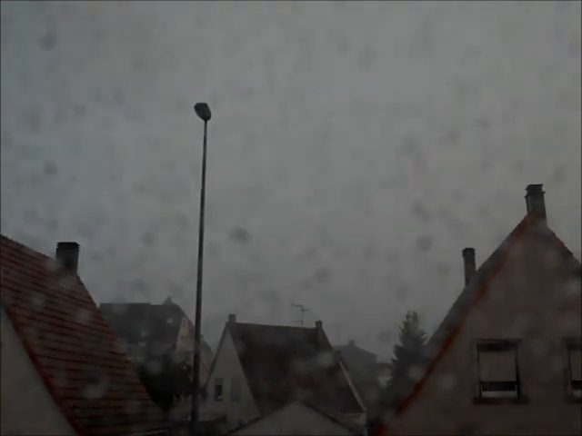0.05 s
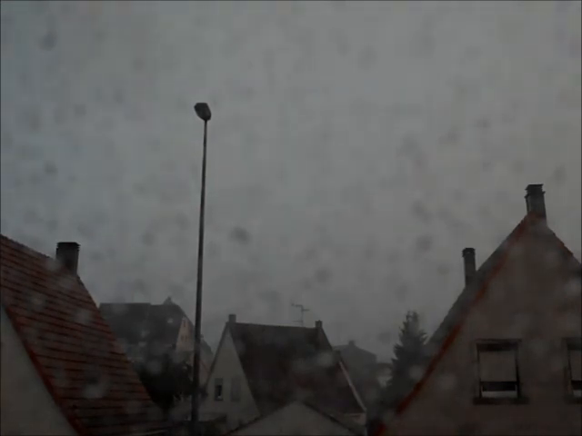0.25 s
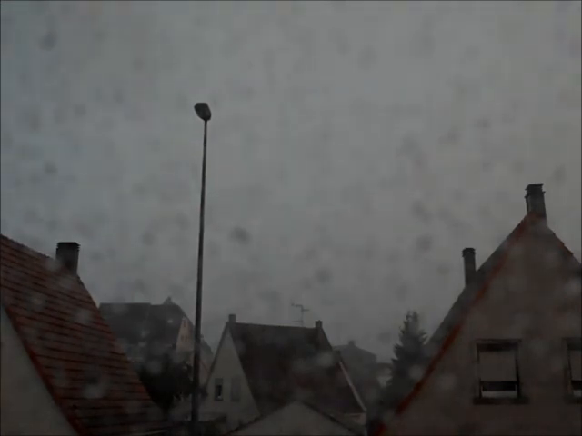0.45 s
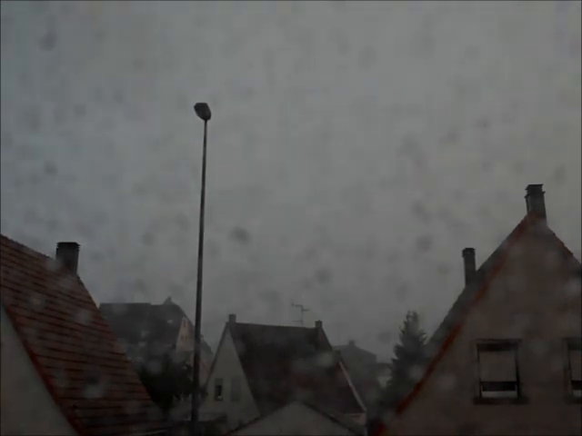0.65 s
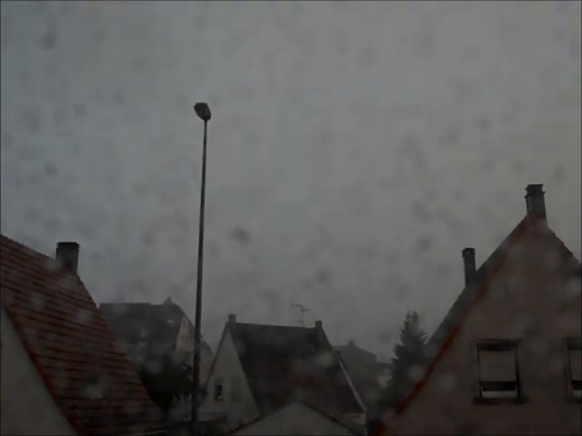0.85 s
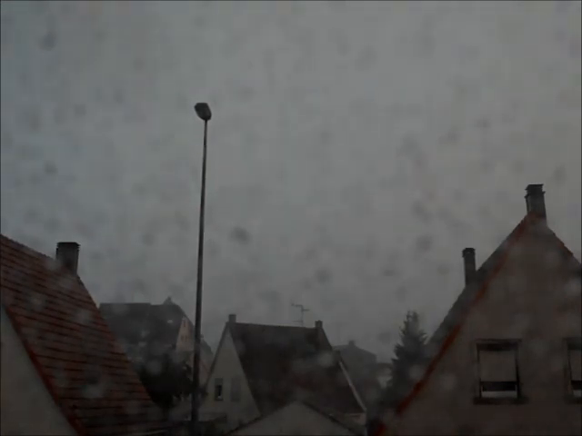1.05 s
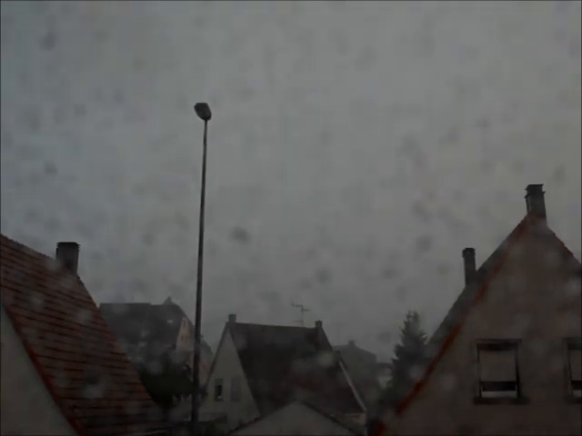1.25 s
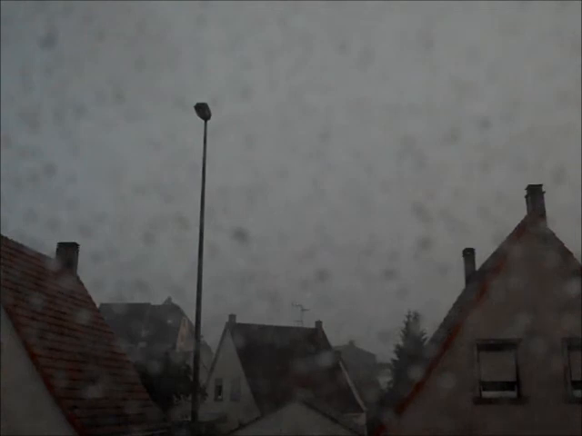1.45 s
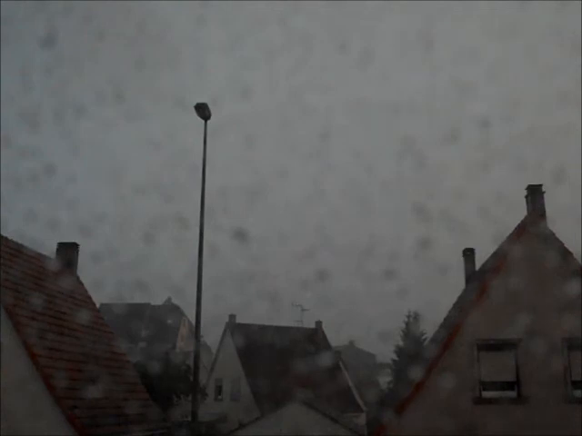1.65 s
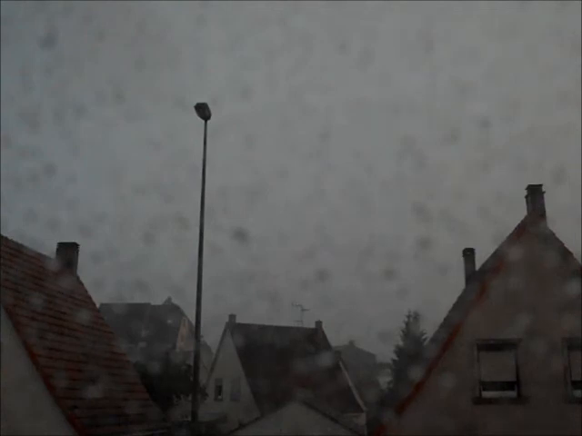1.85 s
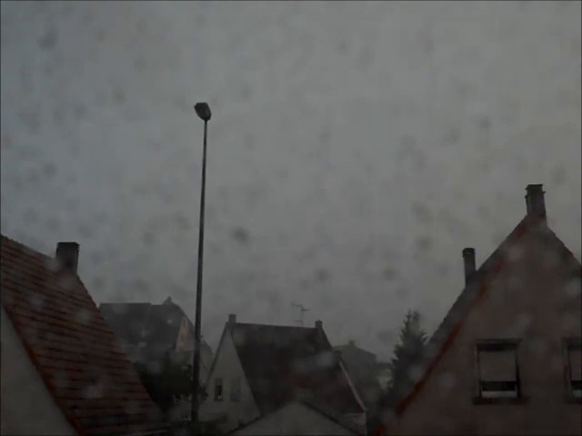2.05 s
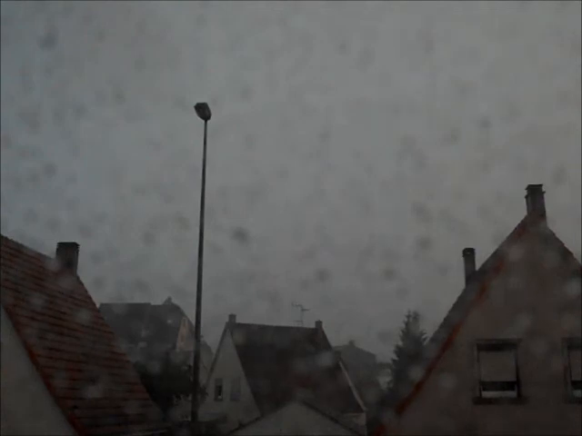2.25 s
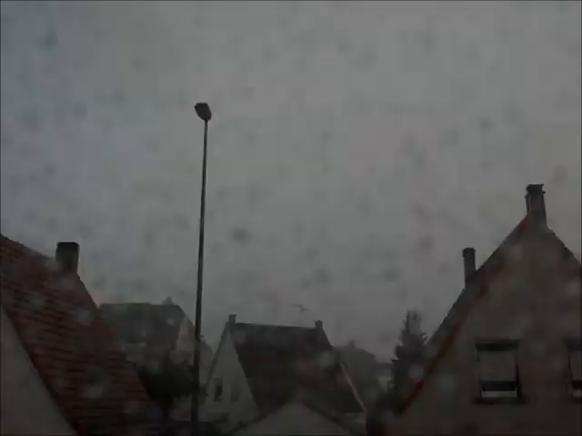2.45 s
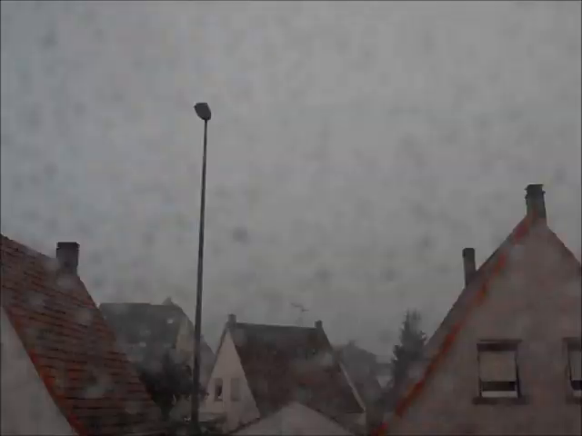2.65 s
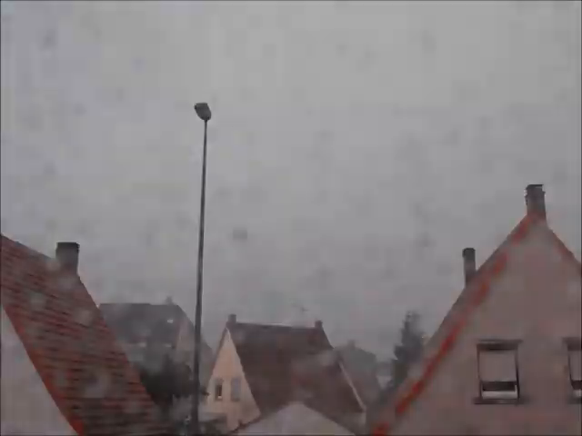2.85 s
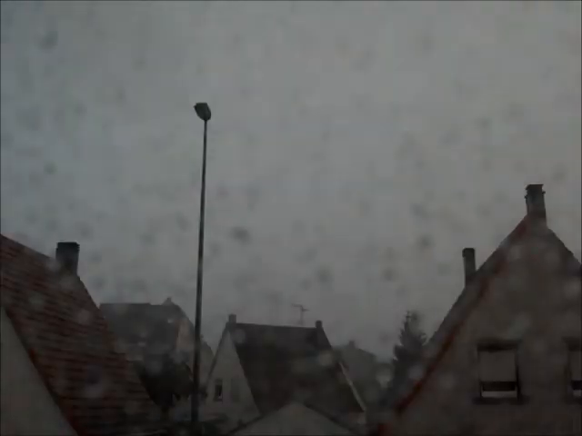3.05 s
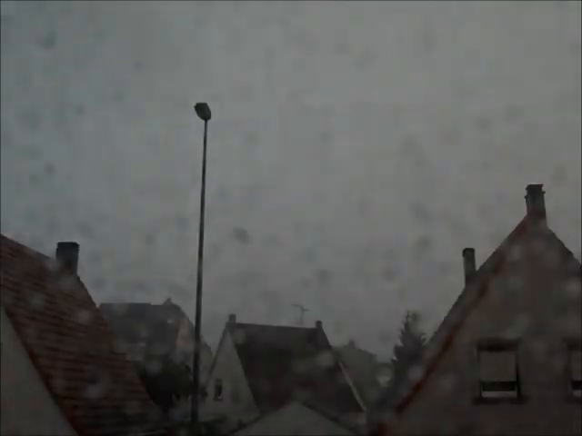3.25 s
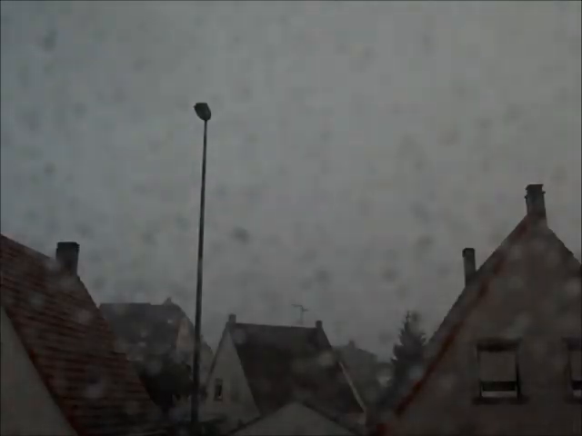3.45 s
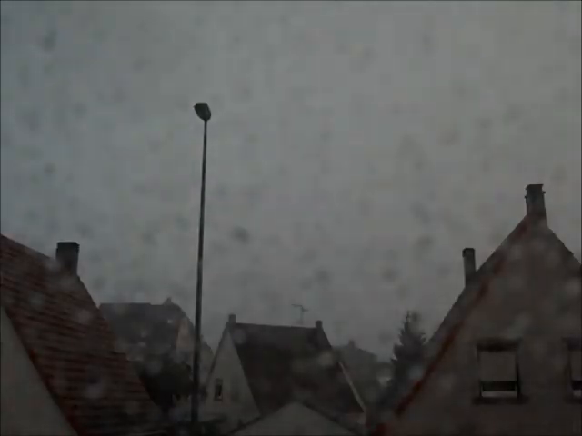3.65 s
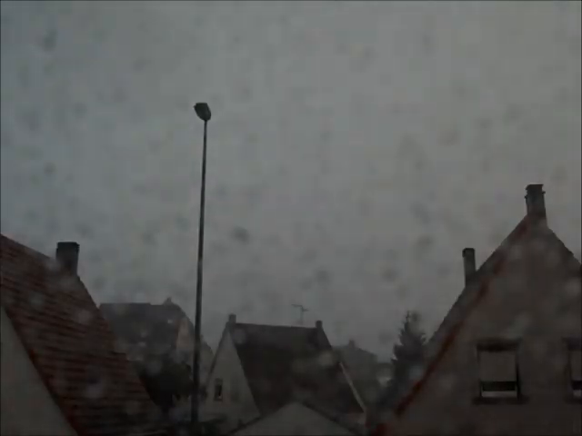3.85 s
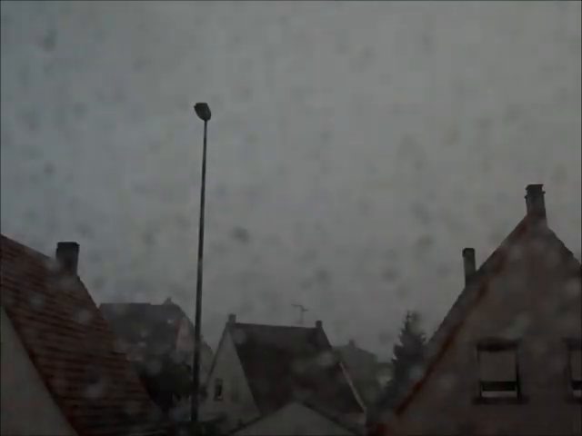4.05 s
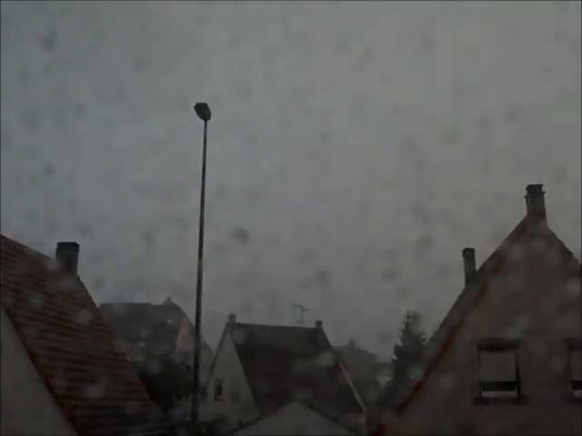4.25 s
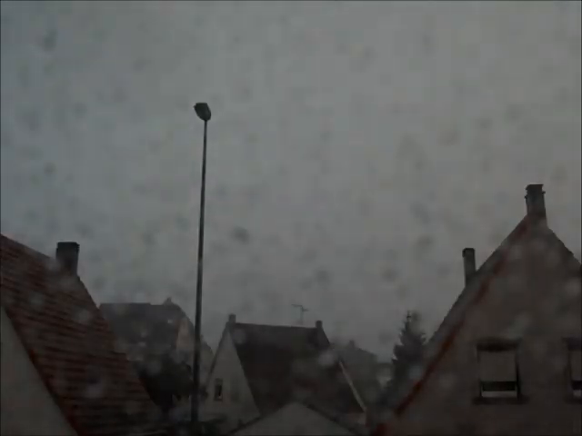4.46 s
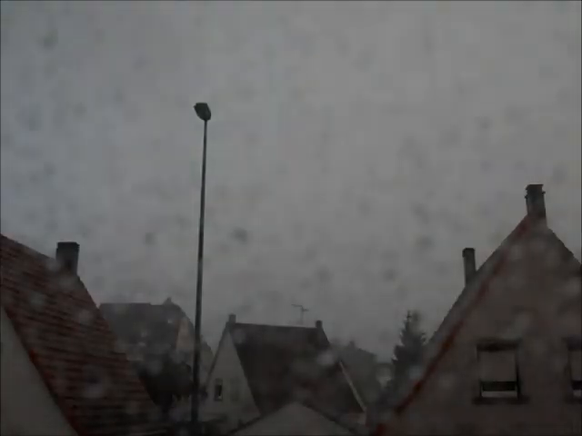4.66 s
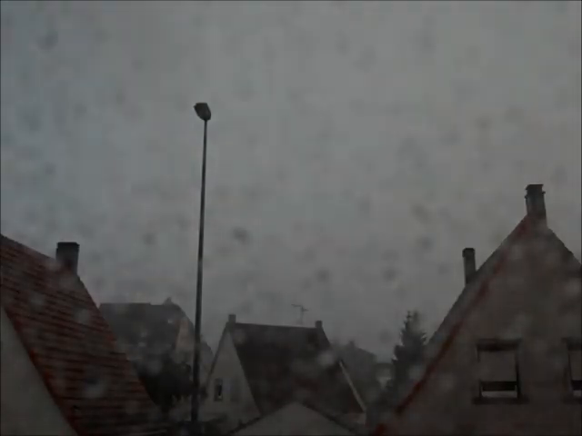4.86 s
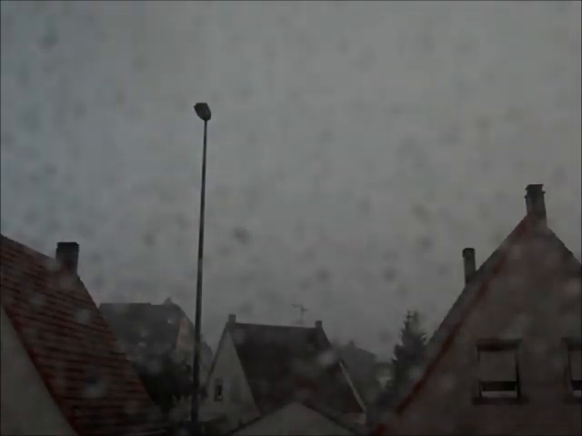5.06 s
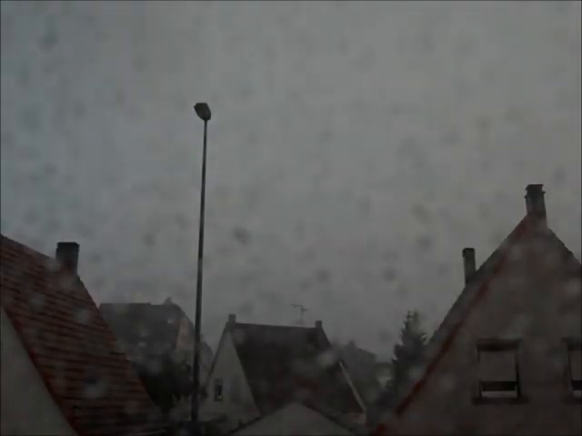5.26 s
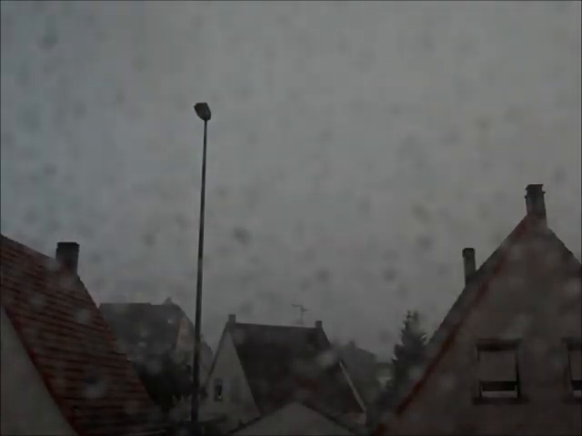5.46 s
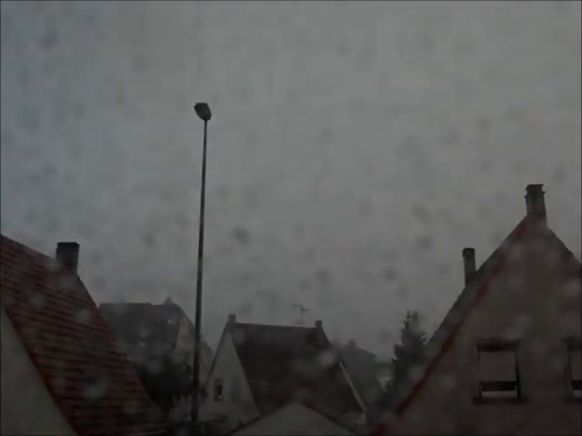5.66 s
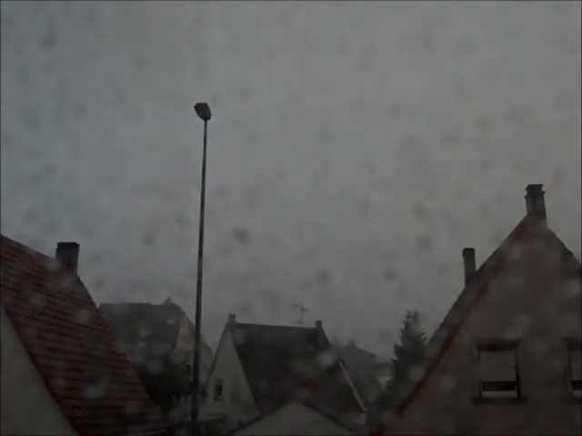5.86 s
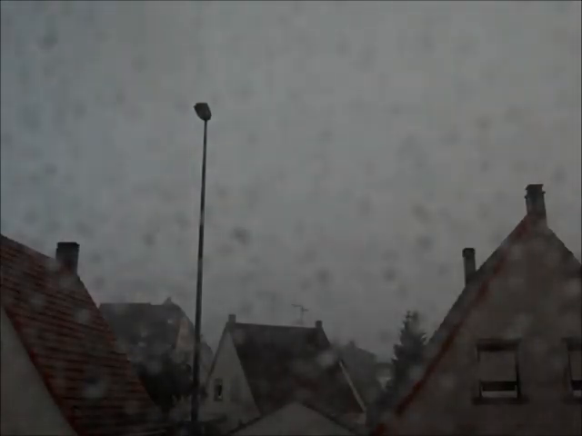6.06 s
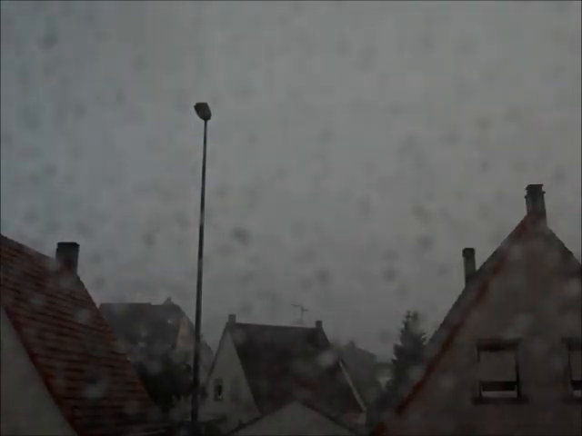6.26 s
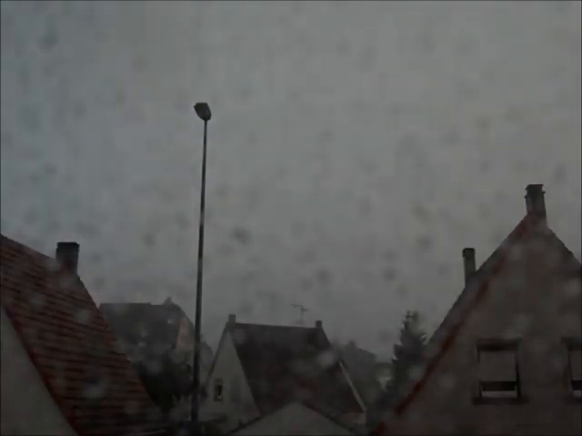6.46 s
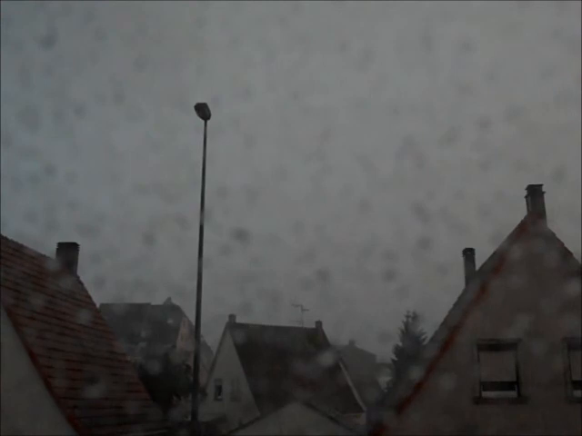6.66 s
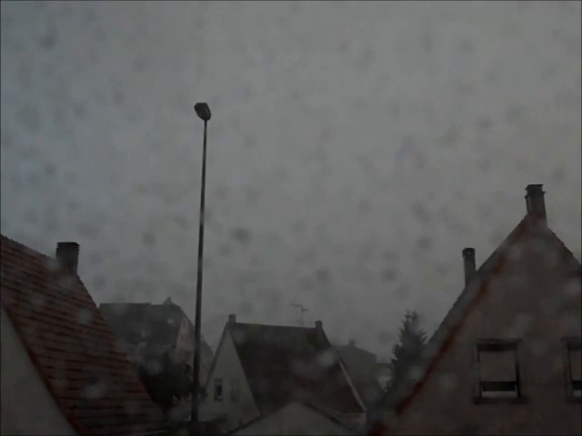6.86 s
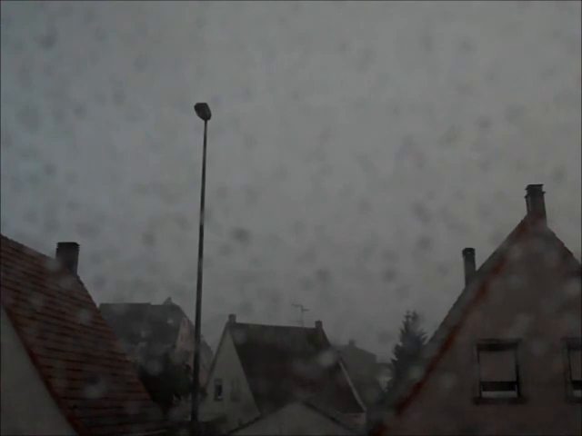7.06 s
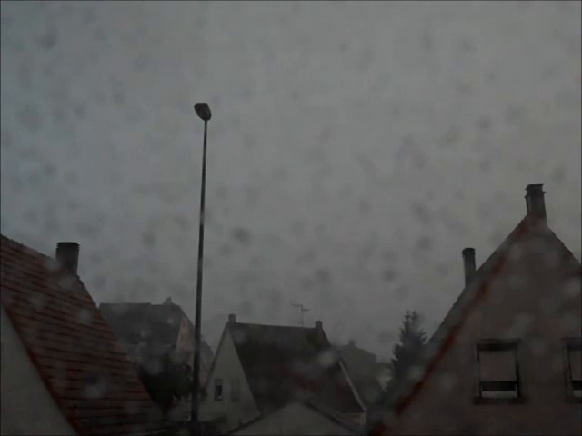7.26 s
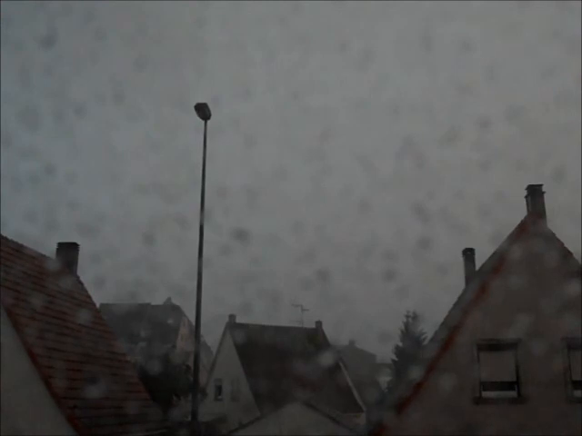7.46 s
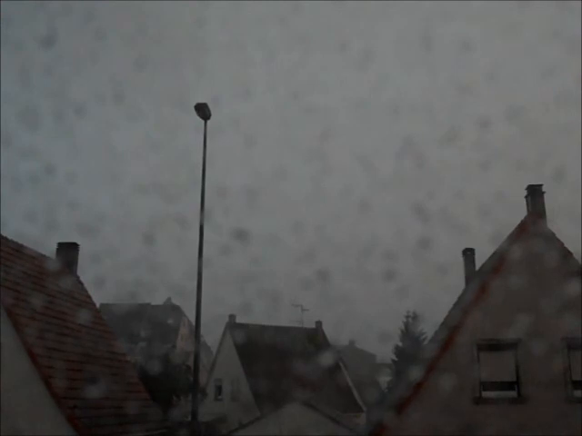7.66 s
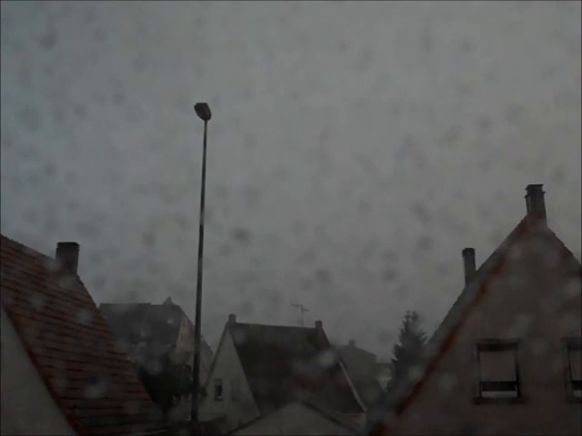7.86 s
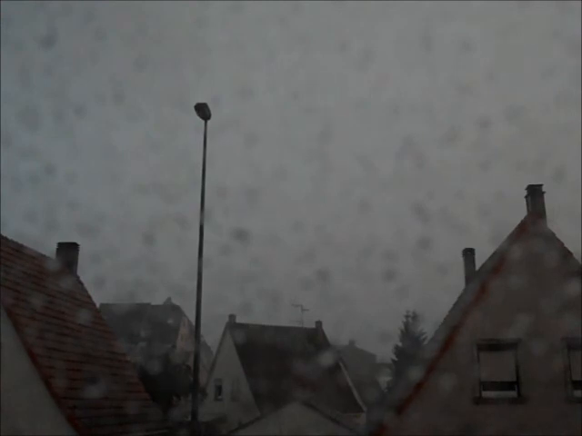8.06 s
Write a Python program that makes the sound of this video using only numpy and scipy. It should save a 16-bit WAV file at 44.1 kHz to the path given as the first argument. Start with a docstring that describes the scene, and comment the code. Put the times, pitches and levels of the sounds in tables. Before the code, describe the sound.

Muffled heavy rain heard behind a closed window, then a sudden close thunderclap crashes in two overloaded peaks and rolls away in low thumps.

```python
"""A room behind a closed window, heard through a small camera while heavy rain falls outside.
Rain is filtered noise and random impulses; heavier drops on the window are short noise bursts.
A close thunderclap sums sub-bass, boom, roar and a tearing edge from overlapping peals; it peaks twice,
overloads the microphone and rolls away in low thumps. Resonances stand for the room and the pane.
A faint whistle and a thin high ring join in; the camera adds hiss and a whine that switches every picture."""
import sys
import numpy as np
from scipy import signal
from scipy.fft import rfft, irfft, next_fast_len
from scipy.io import wavfile
from scipy.ndimage import uniform_filter1d, map_coordinates

SR = 44100
rng = np.random.default_rng(int(sys.argv[2]) if len(sys.argv) > 2 else 0)


def wav_record(signal):
    """Record a signal, one row per channel, as 16-bit PCM in the file named by sys.argv[1]."""
    frames = np.transpose(np.atleast_2d(signal))
    bounded = np.clip(frames, -1, 1)
    # unit amplitude maps onto the largest positive 16-bit level
    quanta = np.round(bounded * 32767).astype(np.int16)
    wavfile.write(sys.argv[1], SR, quanta)


N = 357651

# Shock fronts that stand out of the roll, level before the room: (time [s], peak level [dB])
THUMP_FRONTS = [(4.946, -22), (5.282, -3), (5.37, -5), (5.389, -3), (5.755, 0.5), (5.81, -2), (5.859, -3.5),
                (6.599, -14), (7.075, -7), (7.14, -13), (7.191, -7), (7.205, -7), (7.692, -14)]
# Heavy drops striking the window: (time [s], peak level [dB])
WINDOW_DROPS = [(0.038, -20.5), (1.052, -24), (1.645, -32), (2.184, -24), (3.019, -24), (3.154, -23.5)]
# Standing waves of the room: (frequency [Hz], width [Hz], near level [dB], far level [dB])
ROOM_MODES = [(31, 22, -5, -13), (51, 14, -4, -11), (65.8, 9, -2, 2), (91.4, 4.4, 0.5, -17),
              (120, 5.2, -3, -8), (127, 20, -6, -0.5), (157, 10.7, -2.5, -3), (198.4, 7.2, 9, 5),
              (220.7, 21, -20, -3), (265.1, 11.4, -0.5, 4)]
# Resonances of the window pane: (frequency [Hz], width [Hz], near level [dB], far level [dB])
PANE_MODES = [(417, 20, -15, -3), (453.4, 26, -10, -1), (586, 9.3, -11, -10), (630, 47, 2.5, -28.5),
              (967, 21, -3.5, -1.5), (1150, 54, -17, -3)]
# Faint high ring: (frequency [Hz], width [Hz], level [dB])
RING_MODES = [(2820, 40, -10), (2966, 70, 3), (3320, 60, -9)]

# Relative spectra of the thunder, lowest layer first: (frequency [Hz], level [dB])
SUB_SPECTRUM = [(8, -21), (20, -26), (40, 14), (92, 15.5), (110, 20.5), (160, -61), (600, -120)]
BOOM_SPECTRUM = [(70, -30), (105, -7), (145, 0), (275, -1), (325, -10.5), (420, -22.5), (700, -77),
                 (2500, -120)]
ROAR_SPECTRUM = [(230, -38), (345, -3.5), (400, -1), (500, -3.5), (720, -1.5), (850, -7.5), (960, -13.5),
                 (1150, -29.5), (1800, -58), (5000, -120)]
TEAR_SPECTRUM = [(600, -41.5), (950, -3.5), (1150, -1), (1350, -4.5), (1600, -12.5), (2000, -22.5),
                 (2400, -23.5), (3000, -23.5), (3400, -26.5), (3900, -40.5), (6000, -51), (12000, -87)]
# Relative spectra of the rain's wash, its patter and the storm's murmur: (frequency [Hz], level [dB])
WASH_SPECTRUM = [(150, -23), (300, -5.5), (420, -5), (530, -6), (630, -5), (780, -6.5), (930, -15),
                 (1200, -26), (2000, -71), (6000, -110)]
PATTER_SPECTRUM = [(600, -23.5), (950, -3.5), (1150, -3), (1300, -9), (1500, -14.5), (1800, -16.5),
                   (2400, -21), (3100, -21.5), (3500, -25), (4000, -45), (8000, -39.5)]
MURMUR_SPECTRUM = [(10, 3.5), (30, -2), (52, 1), (78, -1.5), (110, -3.5), (150, 2), (210, -1), (270, -1),
                   (340, -8), (600, -57), (2500, -110)]
# Relative spectrum of the preamplifier hiss: (frequency [Hz], level [dB])
HISS_SPECTRUM = [(100, 16), (2000, 2.5), (3900, 0), (5000, -1.5), (6000, -0.5), (7200, -2), (9000, -1.5),
                 (11000, -3.5), (15800, -4), (18000, -21)]
# Relative spectra of one thump and of one heavy drop: (frequency [Hz], level [dB])
SHOVE_SPECTRUM = [(30, -11), (120, -6), (280, -4.5), (450, -3), (800, -22), (1400, -43), (3000, -46),
                  (9000, -120)]
SPLAT_SPECTRUM = [(150, -2.5), (600, 3.5), (1200, -2), (1800, -21.5), (3200, -23.5), (6000, -30.5),
                  (14000, -55)]

# Gusts that drive the rain harder: (time of the top [s], half width to 1/e [s], rise of the wash [dB])
RAIN_GUSTS = [(0.0, 0.29, 3.0), (2.15, 0.39, 1.1), (3.15, 0.34, 0.8)]
# Peals from different stretches of the lightning channel, the first a soft forerunner:
# (start [s], rise [s], hold [s], fade [dB/s], sub-bass level [dB], boom level [dB], roar level [dB])
THUNDER_PEALS = [(4.58, 0.34, .06, 33, -38, -32.5, -35.5), (4.939, 0.012, 0.22, 34, -25.5, -15, -21),
                 (4.939, 0.33, .11, 43, -25, -7.5, -11), (5.385, .37, .16, 26, -22, -9, -11),
                 (5.723, 0.078, .07, 120, -16, -10, -21), (5.965, .25, 0.04, 21.5, -27.5, -13, -16),
                 (6.275, 0.83, 0.24, 4.5, -37, -23.5, -27), (7.062, 0.0089, 0.016, 11.5, -30.5, -16.3, -39)]

# Rain levels before gusts and easing, and the spread of their slow random drift [dB]
MURMUR_DB, WASH_DB, PATTER_DB, DRIFT_DB = -38.5, -36.5, -43, 0.22
# The rain eases between these times [s] and stays lower by these amounts [dB]
EASE_FROM_S, EASE_TO_S, WASH_EASE_DB, PATTER_EASE_DB = 3.7, 4.4, 2.5, 4.5
# Tearing edge: level against the roar [dB], time constant of its lag [s]
TEAR_DB, TEAR_LAG_S = -12.5, 0.032
# From this time [s] the air dulls the sound of the far channel [dB/s]
FAR_FROM_S, AIR_LOSS_DB_PER_S = 6.4, 4.5
# Uneven rattle of the thunder: spread [dB] and random knots per second
FLUTTER_DB, FLUTTER_RATE = 0.28, 24
# Picture scan line rate and upper limit of the camera's sound [Hz]
SCAN_HZ, TOP_HZ = 15734.2, 15900


def amp(db):
    """A level in decibels is 20 times the logarithm of the amplitude ratio returned."""
    return 10 ** (np.asarray(db) / 20)


def unit(x):
    """Mean power is the mean square; dividing by its root gives rms 1."""
    return x / np.sqrt(np.mean(x ** 2) + 1e-20)


def steady(x, span):
    """Dividing by the running rms over about a span [s] leaves only the faster flutter."""
    width = max(int(span * SR), 2)
    power = uniform_filter1d(uniform_filter1d(x ** 2, width), width)
    return x / np.sqrt(np.abs(power) + 1e-20)


def ramp(start, end):
    """Rises linearly from 0 to 1 between two times [s]; reversed times jump at the second."""
    return np.interp(np.arange(N) / SR, [start, end], [0, 1])


def wobble(rate):
    """Spline interpolation of random knots, rate a second, makes a smooth random curve."""
    knots = rng.standard_normal(1024)
    return map_coordinates(knots, [np.arange(N) * rate / SR], mode="wrap")


def filtered(x, response):
    """A linear system multiplies the spectrum by its complex frequency response."""
    size = next_fast_len(N + SR // 2)
    spectrum = rfft(x, size) * response(np.fft.rfftfreq(size, 1 / SR))
    return irfft(spectrum, size)[:N]


def coloured(x, spectrum, size=16384):
    """Folding the cepstrum of a magnitude response yields a causal, minimum-phase filter."""
    hz, db = np.transpose(spectrum)
    log_grid = np.log(np.fft.rfftfreq(size, 1 / SR) + 1)
    gain = amp(np.interp(log_grid, np.log(hz), db))
    cepstrum = irfft(np.log(gain))
    cepstrum[1:size // 2] *= 2
    cepstrum[size // 2 + 1:] = 0
    impulse_response = irfft(np.exp(rfft(cepstrum)))
    return signal.fftconvolve(x, impulse_response)[:len(x)]


def resonances(x, modes, direct):
    """Damped oscillators respond in parallel, beside a direct share that passes unchanged."""
    def response(f):
        ringing = sum(amp(db) * 1j * f * width / (hz * hz - f * f + 1j * f * width)
                      for hz, width, db in modes)
        return direct + ringing
    return filtered(x, response)


def driven(x, modes, direct, distance):
    """Modal excitation depends on direction: overhead at distance 0, far off at 1."""
    near = resonances(x, [(hz, width, db) for hz, width, db, _ in modes], direct)
    far = resonances(x, [(hz, width, db) for hz, width, _, db in modes], direct)
    return (1 - distance) * near + distance * far


def impulses(rate, diffuse):
    """Random pulses of uneven size, rate a second, stand over noise as the blur of their echoes."""
    pulses = (rng.random(N) < rate / SR) * rng.standard_normal(N)
    return unit(unit(pulses) + diffuse * rng.standard_normal(N))


def strikes(rows, spectrum, scatter, t60):
    """An impulsive push is trailed by reflections that decay by 60 dB in t60 [s]."""
    out, t = np.zeros(N + SR), np.arange(SR // 3) / SR
    for start, peak_db in rows:
        push = scatter * rng.standard_normal(len(t)) * amp(-60 * t / t60)
        push[0] -= 1
        hit = coloured(push, spectrum)
        out[round(start * SR):][:len(t)] += amp(peak_db) * hit / np.abs(hit).max()
    return out[:N]


def camera():
    """Electrical noise: preamplifier hiss and scan whine whose strength and phase flip each frame."""
    t = np.arange(N) / SR
    frame_rate = SCAN_HZ / 525
    odd_frame = np.floor((t - .063) * frame_rate) % 2
    odd_frame = uniform_filter1d(odd_frame, size=40)  # softens the switching
    # the main whine lies at half the line rate
    whine = amp(-43.5 - 4.6 * odd_frame) * np.sin(np.pi * SCAN_HZ * t - 1.6 * odd_frame)
    line_tone = amp(-64) * np.sin(2 * np.pi * SCAN_HZ * t)
    extra_tone = amp(-68.0) * np.sin(2 * np.pi * 9834 * t)
    hiss = amp(-46.5) * unit(coloured(rng.standard_normal(N), HISS_SPECTRUM))
    return whine + line_tone + extra_tone + hiss


def rain():
    """Superposed drop impacts on roofs and street, dulled by glass, lie over the storm's murmur."""
    t, easing = np.arange(N) / SR, ramp(EASE_FROM_S, EASE_TO_S)
    wash = coloured(impulses(rate=2500, diffuse=0.91), WASH_SPECTRUM)
    wash = driven(wash, PANE_MODES, direct=2.2, distance=0.36)
    patter = coloured(impulses(rate=1300, diffuse=1.0), PATTER_SPECTRUM)
    murmur = coloured(rng.standard_normal(N), MURMUR_SPECTRUM)
    murmur = driven(murmur, ROOM_MODES, direct=1.5, distance=0.87)
    gust_db = sum(db * np.exp(-((t - top) / width) ** 2) for top, width, db in RAIN_GUSTS)
    gust_db = gust_db + DRIFT_DB * wobble(3.84)
    wash_db = WASH_DB + gust_db - WASH_EASE_DB * easing
    patter_db = PATTER_DB + .9 * gust_db - PATTER_EASE_DB * easing
    # the murmur grows as the storm draws near
    murmur_db = MURMUR_DB + 0.9 * gust_db + 2.2 * ramp(3.1, 3.6)
    drops = amp(wash_db) * unit(wash) + amp(patter_db) * unit(patter)
    return drops + amp(murmur_db) * steady(murmur, span=0.11)


def high_ring():
    """Narrow resonances select a thin ring from noise; it grows slowly and stays under the thunder."""
    ring = resonances(rng.standard_normal(N), RING_MODES, direct=0)
    return amp(-59.0) * ramp(2.5, 6.4) * unit(ring)


def whistle():
    """One narrow resonance turns noise into a tone that briefly swells out of the rain."""
    swell = ramp(2.12, 2.15) * (1 - ramp(2.195, 2.215))
    tone = resonances(rng.standard_normal(N), [(1205, 12, 0)], direct=0)
    return amp(-43) * swell * steady(tone, span=.05)


def spatters():
    """Impact excitation: each heavier drop strikes the window sharply and dies away."""
    return strikes(WINDOW_DROPS, SPLAT_SPECTRUM, scatter=.2, t60=0.15)


def thumps():
    """Impulsive excitation of modes: the strongest fronts shove the window and ring the room."""
    shoves = strikes(THUMP_FRONTS, SHOVE_SPECTRUM, scatter=0.026, t60=0.066)
    # the far resonances take over abruptly at the second time
    return driven(shoves, ROOM_MODES, direct=0.63, distance=ramp(6.4, 5.75))


def peals():
    """Powers of incoherent sources add: each peal rises, holds and fades in three bands."""
    t, power = np.arange(N) / SR, np.zeros((3, N))
    for start, rise, hold, fade, *levels_db in THUNDER_PEALS:
        decay = amp(-fade * np.maximum(t - start - rise - hold, 0))
        shape = ramp(start, start + rise) * decay
        power += (amp(levels_db)[:, None] * shape) ** 2
    return np.sqrt(power)


def tearing(roar_gain):
    """Air absorption weakens the tearing edge with path length; its amplitude lags the roar."""
    keep = np.exp(-1 / (TEAR_LAG_S * SR))
    loss_db = AIR_LOSS_DB_PER_S * np.maximum(np.arange(N) / SR - FAR_FROM_S, 0)
    lagging = signal.lfilter([1 - keep], [1, -keep], roar_gain)
    return amp(TEAR_DB - loss_db) * lagging


def thunder():
    """Shocks from along the crooked channel superpose; later, farther ones have lost their treble."""
    sub_gain, boom_gain, roar_gain = peals()
    # the far resonances of the roll take over abruptly at 5.8 s
    second_peal, far_roll = ramp(5.49, 5.64), ramp(6.7, 5.8)
    sub = coloured(impulses(rate=300, diffuse=0.47), SUB_SPECTRUM)
    sub = driven(sub, ROOM_MODES, direct=0.36, distance=far_roll)
    boom = coloured(impulses(rate=800, diffuse=1.0), BOOM_SPECTRUM)
    boom = driven(boom, ROOM_MODES, direct=0.09, distance=second_peal)
    # the same sharp fronts carry the roar and its tearing edge through the pane
    pane_distance = 0.65 * second_peal + 0.46 * far_roll
    fronts = driven(impulses(rate=3000, diffuse=0.95), PANE_MODES, direct=1.27, distance=pane_distance)
    roar = steady(coloured(fronts, ROAR_SPECTRUM), span=0.055)
    tear = steady(coloured(fronts, TEAR_SPECTRUM), span=0.14)
    rumble = sub_gain * steady(sub, span=0.068) + boom_gain * steady(boom, span=0.053)
    crash = roar_gain * roar + tearing(roar_gain) * tear
    # close fronts rattle unevenly
    return amp(FLUTTER_DB * wobble(FLUTTER_RATE)) * (rumble + crash)


def scene():
    """Linear superposition of rain, small sounds and thunder in the room."""
    return (rain() + spatters() + whistle() + thunder() + thumps() + high_ring())[None]


def record(dry):
    """Saturation limits the loudest peaks; the camera dulls the treble, adds noise and cuts the top."""
    clipped = dry[0] / (1 + np.abs(dry[0]) ** 60) ** (1 / 60)
    dulled = filtered(clipped, lambda hz: 1 / np.sqrt(1 + (hz / 10500) ** 8))
    return filtered(dulled + camera(), lambda hz: hz < TOP_HZ)[None]


dry = scene()
out = record(dry)
wav_record(out)
```